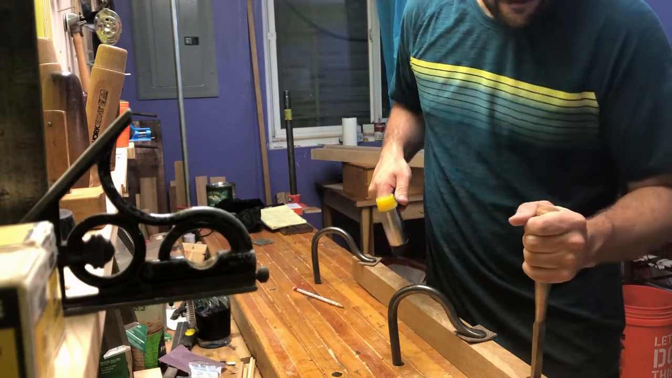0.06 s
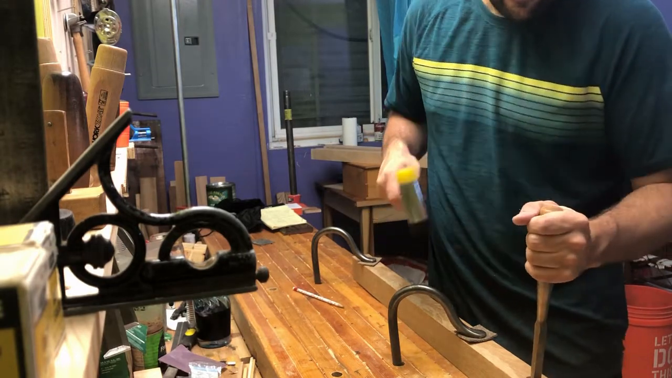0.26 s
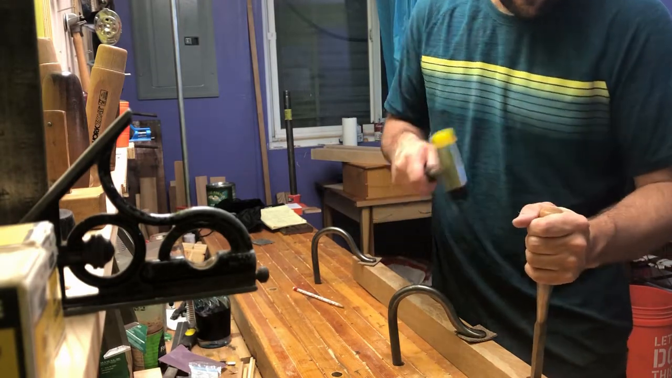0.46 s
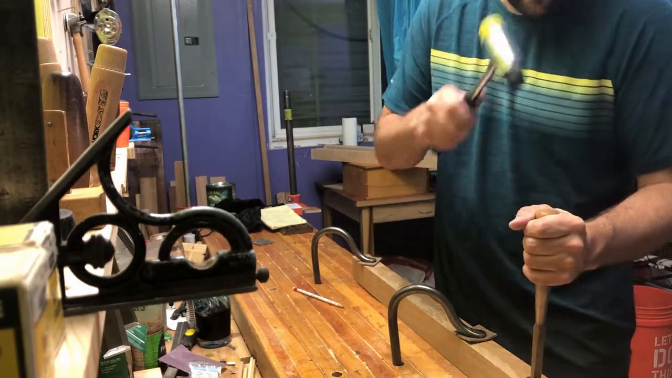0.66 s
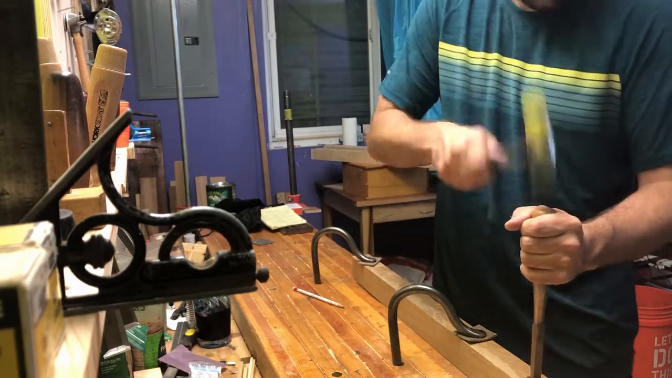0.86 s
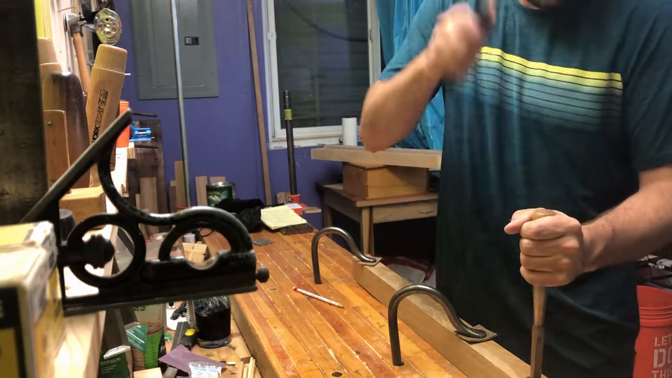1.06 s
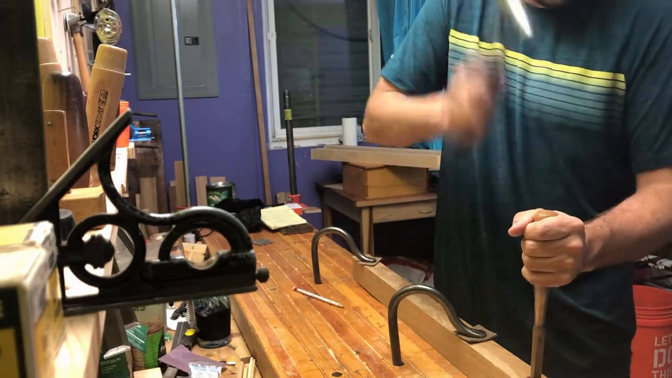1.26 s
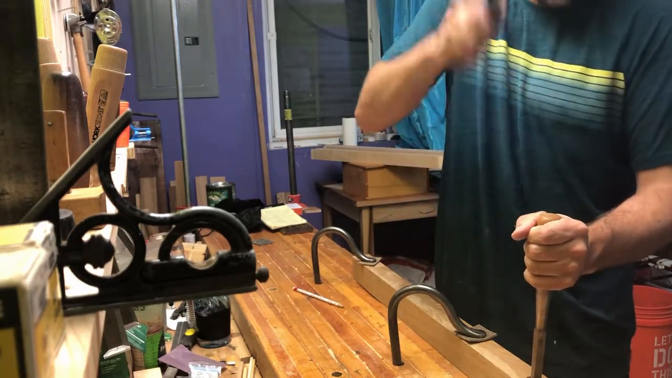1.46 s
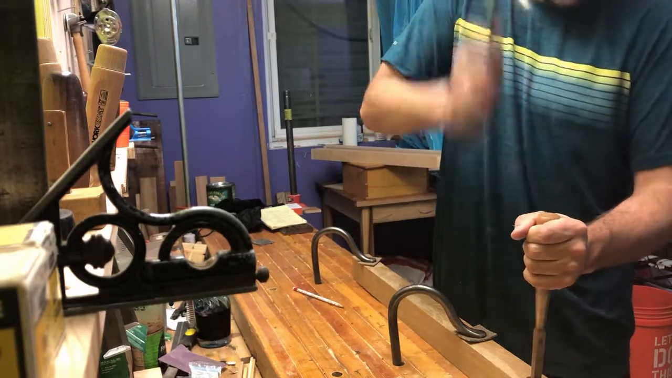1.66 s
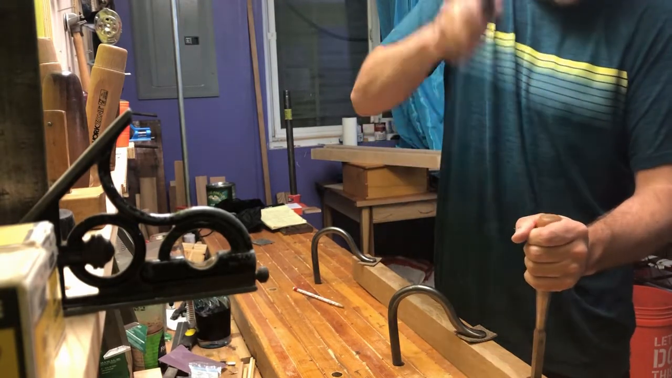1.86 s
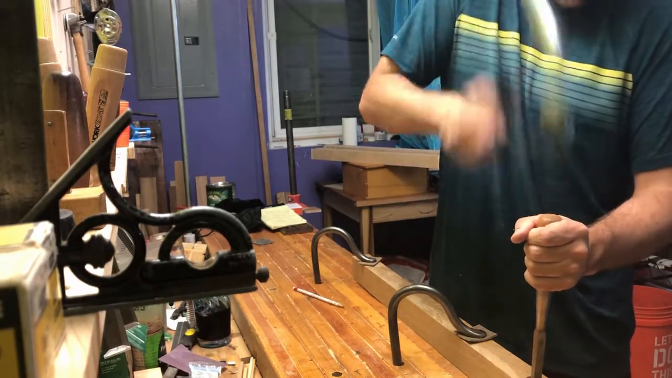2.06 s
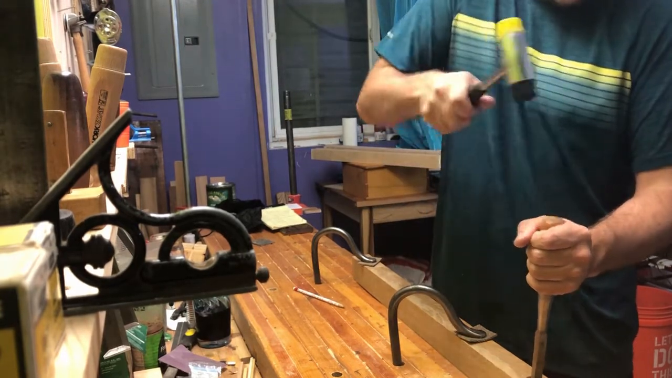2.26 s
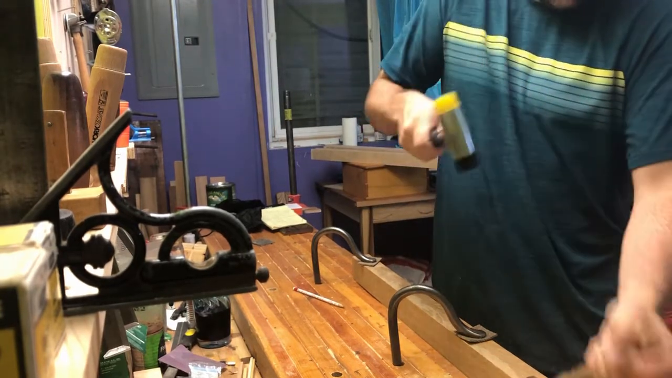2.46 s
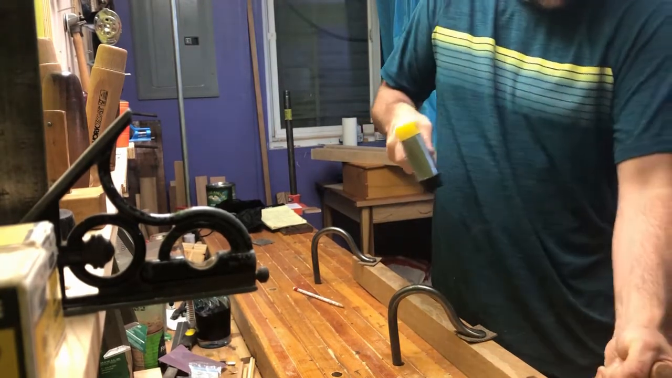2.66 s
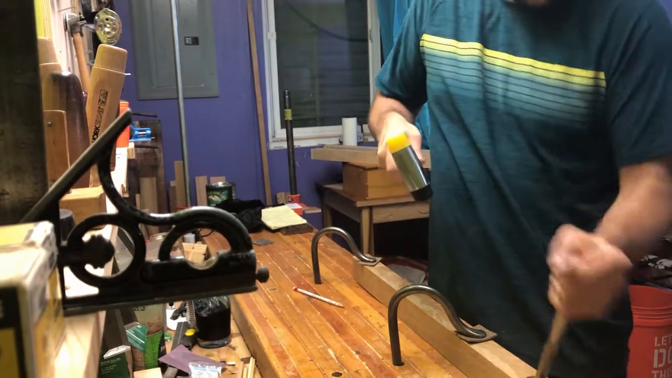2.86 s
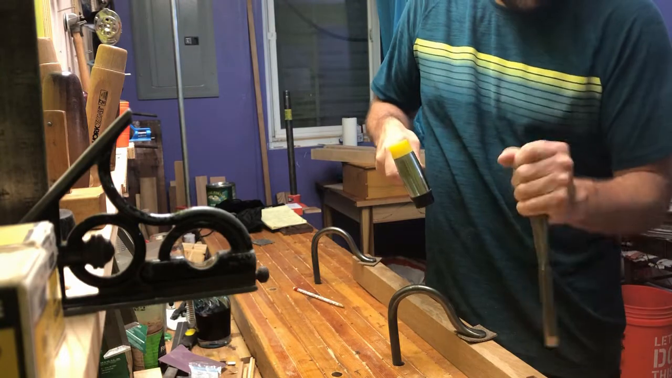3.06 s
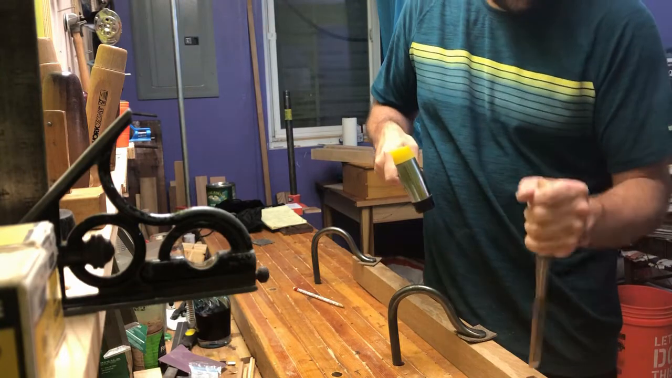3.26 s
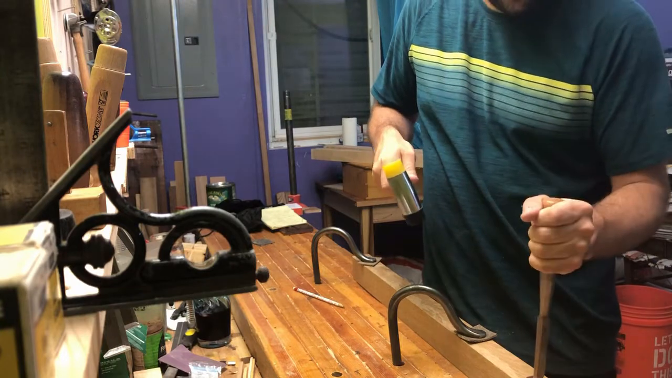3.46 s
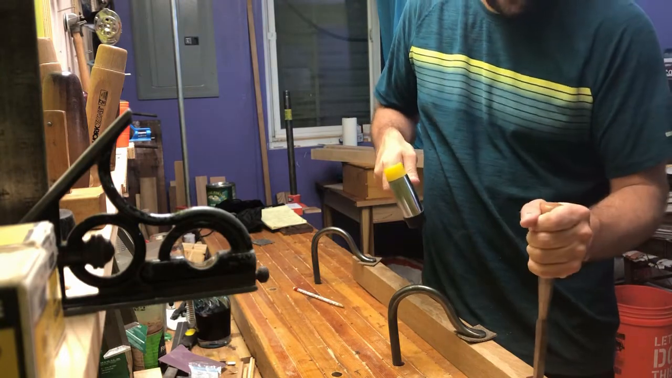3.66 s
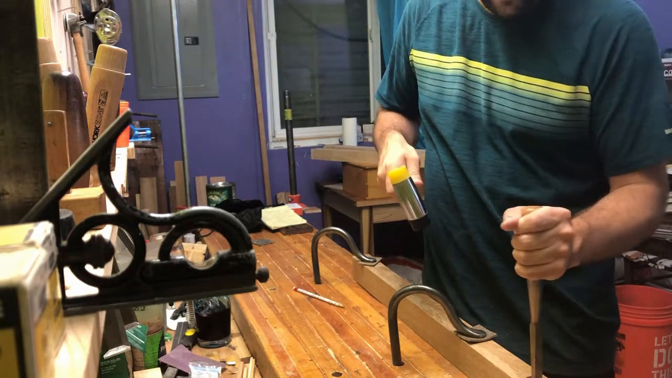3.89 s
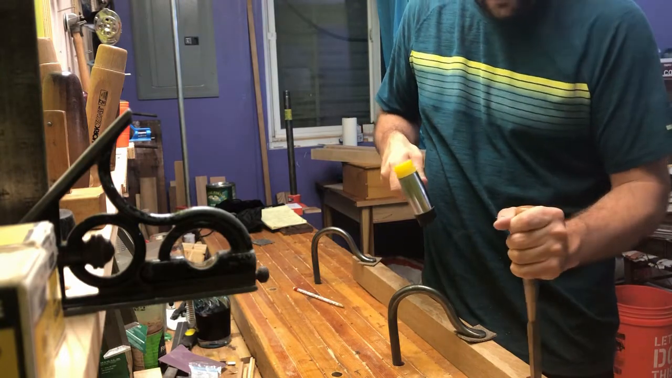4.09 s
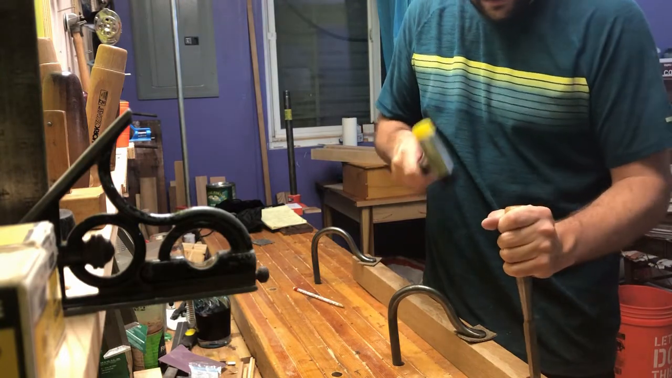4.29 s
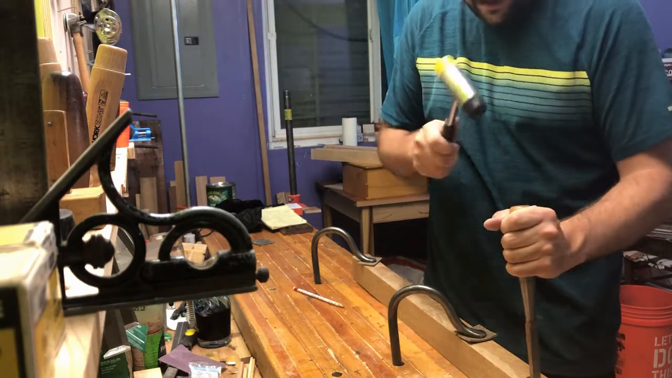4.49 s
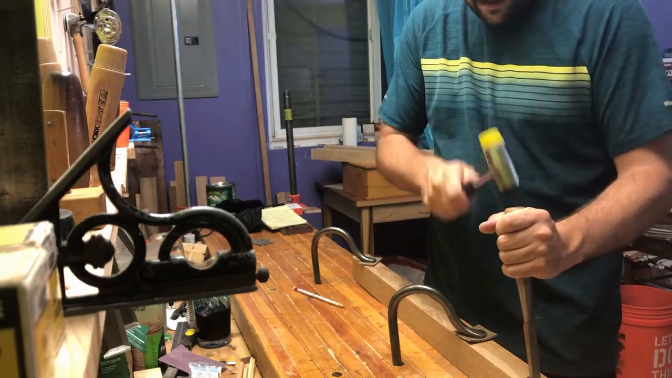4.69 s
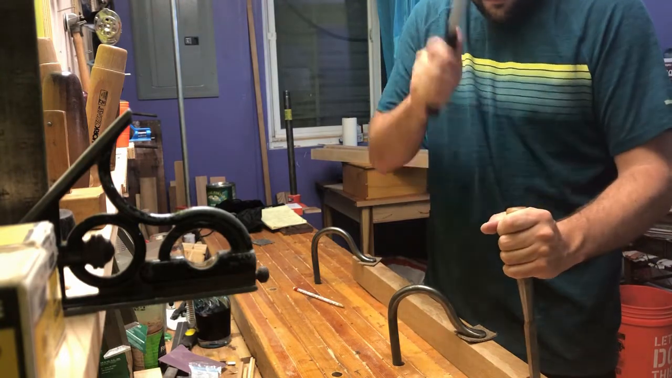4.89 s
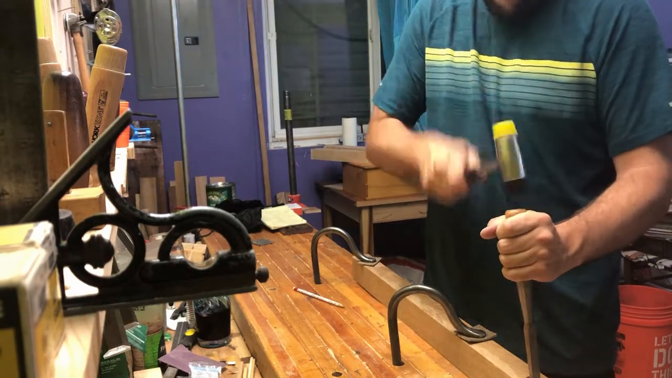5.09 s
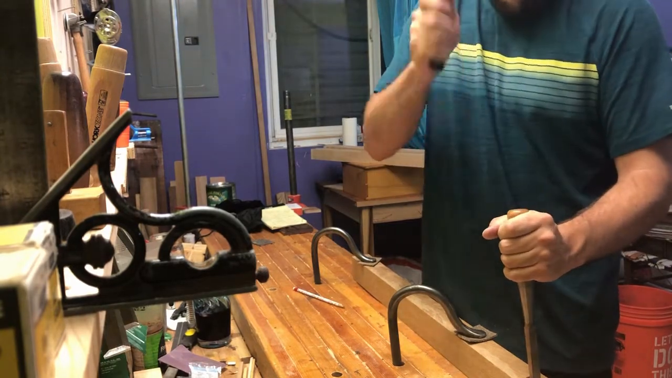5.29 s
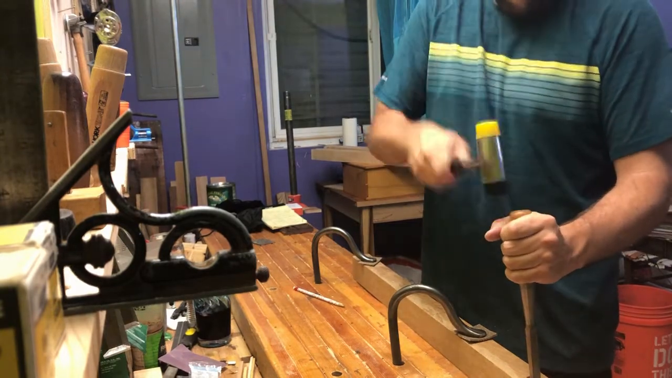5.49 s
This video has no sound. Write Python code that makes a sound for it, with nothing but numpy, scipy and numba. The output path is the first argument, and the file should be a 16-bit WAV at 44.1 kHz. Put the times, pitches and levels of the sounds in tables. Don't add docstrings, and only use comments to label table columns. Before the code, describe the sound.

Phone recording a metre from a workbench. After a second of faint hum and one small clunk, four mallet blows come about 0.4 seconds apart, the first lighter, the others loud and hard-limited, each a crack with low wooden thump, high steel ring and quick wall slap. Then quiet scraping, soft thuds and snapping chips as the chisel is moved, followed by two lighter, crisp blows with room reverberation.

```python
import sys
import numpy as np
from scipy import signal
from scipy.fft import rfft, irfft
from scipy.io import wavfile
from scipy.ndimage import uniform_filter1d, minimum_filter1d
from numba import njit

SR = 44100
rng = np.random.default_rng(int(sys.argv[2]) if len(sys.argv) > 2 else 0)


def gain_from_db(level_db):
    decades = np.asarray(level_db, float) / 20
    return 10 ** decades


def persist_wave(psi):
    counts = np.round(np.clip(psi, -1, 1) * 32767).astype(np.int16)
    wavfile.write(sys.argv[1], SR, np.atleast_2d(counts).T)


N = 244093
T = np.arange(N) / SR
TOP_HZ, STEADY_TOP_HZ, BASS_HZ = 17100, 15750, 45


def on_log_hz(table, hz):
    f, v = np.transpose(table)
    return np.interp(np.log(np.maximum(hz, 1)), np.log(f), v)


def coloured(table, size):
    hz = np.arange(size // 2 + 1) * SR / size
    return irfft(rfft(rng.standard_normal(size)) * gain_from_db(on_log_hz(table, hz)), size)


def unit(x):
    return x / np.sqrt(np.mean(x ** 2))


def band(x, lo_hz, hi_hz):
    return signal.sosfilt(signal.butter(2, [lo_hz, min(hi_hz, SR / 2.1)], "band", fs=SR, output="sos"), x)


def low_pass(x, hz):
    return signal.sosfilt(signal.ellip(8, .2, 60, hz, fs=SR, output="sos"), x)


def ring(modes, lag_s=0., rise_s=1e-4, scatter_db=3.5, detune=0.0089, size=30000):
    hz, db, t60 = np.transpose(modes)[:, :, None]
    level_chance, pitch_chance = rng.standard_normal((len(modes), 2)).T[:, :, None]
    t = np.maximum(np.arange(size) / SR - lag_s * np.sqrt(300 / hz), 0)
    decay = (1 - np.exp(-t / rise_s)) * gain_from_db(-60 * t / t60)
    tone = np.sin(2 * np.pi * hz * (1 + detune * pitch_chance) * t)
    return np.sum(gain_from_db(db + scatter_db * level_chance) * decay * tone, axis=0)


def add(out, s, x):
    i = int(s * SR)
    out[i:i + len(x)] += x[:N - i]


# pitch_hz, level_db (rms)
HUM_TONES = [(59.2, -59.5), (118.4, -63.5), (177.6, -66.5), (242.2, -62.5), (306.8, -71), (387.6, -68.5),
             (446.8, -76.5)]
# pitch_hz, density_db (per Hz)
AIR_COLOUR = [(15, -34.5), (25, -13.5), (58, -3.5), (192, -8), (245, -8), (389, -15), (568, -21.5),
              (706, -22.5), (878, -31.5), (1320, -30.5), (1640, -33), (14800, -54), (16500, -42.5)]
AIR_DB = -63.5


def background():
    air = coloured(AIR_COLOUR, N)
    air = air * gain_from_db(AIR_DB) / np.std(band(air, 340, 16000))
    for hz, db in HUM_TONES:
        waver = unit(uniform_filter1d(rng.standard_normal(N), SR // 8))
        hum = np.sin(2 * np.pi * (hz * T + rng.random()))
        air = air + np.sqrt(2) * gain_from_db(db + 1.5 * waver) * hum
    return air


# start_s, level_db, pitch_hz
SNAPS = [(0.606, -60, 4500), (1.741, -61, 12900), (2.6, -62.5, 13000), (1.306, -59, 4900),
         (1.307, -57.5, 10500), (1.336, -68, 10050), (1.352, -54.5, 1750), (1.353, -61, 6400),
         (1.740, -48.5, 4445), (2.082, -61, 11200), (2.33, -60, 12000), (2.494, -67, 11460),
         (2.515, -63.5, 8040), (2.53, -60.5, 12940), (2.546, -63.5, 9880), (2.791, -63, 5020),
         (3.039, -60.5, 7430), (3.074, -59.5, 7700), (3.1, -72, 7820), (3.553, -61, 4530),
         (3.555, -63, 7300), (3.964, -56, 3028), (3.975, -59.5, 4500), (3.985, -63, 6910),
         (4.364, -59.5, 4760)]
TICK_T60_S = 0.01


def ticks():
    out, t = np.zeros(N), np.arange(2048) / SR
    for s, db, hz in SNAPS:
        noise = band(rng.standard_normal(len(t)), 0.65 * hz, 1.3 * hz)
        snap = unit(band(noise, .5 * hz, 2 * hz))
        mode = ring([(hz, 0, 1.5 * TICK_T60_S)], size=len(t))
        add(out, s, gain_from_db(db - 60 * t / TICK_T60_S) * snap + gain_from_db(db - 2) * mode)
    return out


# loudest_s, level_db, treble_db (re level), fade_s
STROKES = [
    (.608, -55.5, -14, 0.087),
    (2.629, -59, -11.5, 0.056),
    (3.04, -59.5, -17, 0.16),
    (3.37, -74.5, -4, 0.46),
    (3.65, -70, -14, 0.23),
    (3.929, -70.5, -14.5, 0.14),
    (3.968, -60.5, -14, 0.096),
    (4.3, -71, -7, 0.22),
    (4.45, -69.5, -13, 0.041),
]
RUB_RISE_S = 0.0532


def rubs(grain_db=-7.0):
    out = np.zeros(N)
    grain_levels = np.repeat(rng.exponential(size=N // 40 + 1), 40)[:N]
    grains = rng.standard_normal(N) * gain_from_db(grain_db * grain_levels)
    body, hiss = unit(band(grains, 610, 4240)), unit(band(grains, 4600, 11000))
    for s, db, treble_db, fade_s in STROKES:
        away = np.maximum((s - T) / RUB_RISE_S, (T - s) / fade_s)
        out += gain_from_db(db - 60 * away) * (body + gain_from_db(treble_db) * hiss)
    return out


# pitch_hz, level_db, t60_s
BENCH_MODES = [(81.14, -19.5, 0.075), (97, -21.5, 0.44), (133.7, -19, 0.47), (209, -1, 0.36),
               (225.3, -5, 0.18), (278, -14, 0.66), (314, -13, 0.1), (337.4, -14.5, 0.3), (376.8, -6, 0.22),
               (420.3, -4.5, .3), (452, 1.5, 0.21), (499, -12, 0.43), (534, -8.5, 0.23), (675, -24.5, 0.2)]
# start_s, thud_db, thud_hz, knock_db (re thud), knock_hz
SET_DOWNS = [(0.613, -35, 345, -16.5, 1360), (2.643, -45.5, 560, 3.5, 850), (2.809, -55, 520, -2, 861),
             (3.037, -53.5, 460, 3, 1566), (3.063, -45, 370, 0, 1314), (3.083, -34.5, 365, -12, 1150),
             (3.1, -34.5, 384, -27.5, 1280), (3.555, -34.5, 246, -17, 2330), (3.557, -34, 426, -22, 1300),
             (3.575, -43, 505, -9, 912), (3.636, -38, 408, -4.5, 1325), (3.67, -44, 440, -5.5, 1108),
             (3.967, -41, 500, -2, 1510), (4.001, -47, 515, -6, 1187)]
SWELL_S = 0.0024


def knocks():
    out = np.zeros(N)
    for s, db, thud_hz, knock_db, hz in SET_DOWNS:
        near = [(f, g / 2 - 45 * np.log2(f / thud_hz) ** 2 - 3, 0.38 * t60) for f, g, t60 in BENCH_MODES]
        thud = ring(near + [(thud_hz, -4, .06)], rise_s=SWELL_S, lag_s=0.0018, size=8192)
        beam = [(hz, 0, .02), (1.11 * hz, -4, .015), (1.68 * hz, -14, .012)]
        add(out, s, gain_from_db(db) * thud)
        add(out, s, gain_from_db(db + knock_db) * ring(beam, rise_s=0.0015, size=4096))
    return out


# pitch_hz, density_db (per Hz)
SMEAR_COLOUR = [(300, -12), (700, -2), (1500, 0), (3000, -10), (6000, -22), (16500, -40)]
SMEAR_DB, SMEAR_S = -46, .021


def smear():
    out, size = np.zeros(N), int(SMEAR_S * SR)
    for s, db, *_ in STRIKES:
        noise = unit(coloured(SMEAR_COLOUR, 1024))[:size]
        add(out, s - SMEAR_S, gain_from_db(db + SMEAR_DB + np.linspace(-2, 4, size)) * noise)
    return out


# pitch_hz, density_db (per Hz)
SHOCK_COLOUR = [(35, -39), (60, -9), (320, 5.5), (478, 0.5), (697, -8.5), (1200, -13), (1480, -11.5),
                (2110, -20), (2370, -25), (3150, -26.5), (6390, -36.5), (15300, -43), (16800, -44)]
SHADE_HZ = [120, 350, 1500, 4500, 13000]


def pulse(shades_db, spread_s, knee_hz=150, size=4096):
    hz = np.arange(size // 2 + 1) * SR / size
    shades = list(zip(SHADE_HZ, shades_db))
    gain = gain_from_db(on_log_hz(SHOCK_COLOUR, hz) + on_log_hz(shades, hz))
    turns = spread_s * 400 * np.log(1 + hz / knee_hz) + .0005 * hz
    shock = irfft(gain * np.exp(-2j * np.pi * turns), size)
    return shock / np.abs(shock).max()


def crackle(grain_db=3.5, size=4096):
    t = np.arange(size) / SR
    grains = rng.standard_normal(size) * gain_from_db(grain_db * rng.exponential(size=size))
    fade = np.exp(-t / 0.0027) + 0.25 * np.exp(-t / 0.013)
    return unit(low_pass(band(grains, 1500, 15000), STEADY_TOP_HZ)) * fade


def bench_boom(db, thump_db, spread_s):
    modes = []
    for hz, mode_db, t60 in BENCH_MODES:
        tilt = .8 if hz < 250 else -1.5 if hz < 300 else .1
        modes.append((hz, mode_db + thump_db * tilt, t60))
    return gain_from_db(db + BENCH_DB) * ring(modes, lag_s=spread_s, rise_s=0.008, detune=.005, size=22000)


# start_s, level_db, wall_db (share of the walls), hardness_db, rebound_db
STRIKES = [
    (1.002, -17.5, -1, 5.5, -17),
    (1.432, -5, 0, 4, -37),
    (1.8251, -4, 2, 5, -18),
    (2.204, -5, 2, 1, -14),
    (4.801, -14.5, -2, -1.5, -22),
    (5.187, -12.5, 9.5, 6.5, -20),
]
# lag_s (after the blow), level_db
DROPS = [
    (0.025, -8),
    (0.045, -6),
]
# pitch_hz, width_hz, level_db
BEAM_MODES = [(1005, 130, -4.5), (1386, 98, 7), (1994, 140, 0.5), (2480, 170, -10.5), (2704, 170, -8.5),
              (3560, 43, -21), (4480, 75, -15), (5200, 150, -12)]
# pitch_hz, width_hz, level_db
HANDLE_MODES = [(973, 29, -8.5), (1286, 41, -4), (1724, 21, -12), (2600, 47, -17.5), (2854, 78, -5),
                (3520, 93, -9), (4200, 96, -16), (5500, 120, -50)]
LIGHT_DB, WOOD_PITCH = -9, 1.045
BEAM_DB, BENCH_DB = -4.5, -5.5
THUMP_DB, THUMP_PER_DB = -4, -.49
KNOCK_DB, KNOCK_PER_DB = 5, 0.4
SNAP_PER_HARDNESS = 0.57
SPREAD_S, SPREAD_S_PER_HARDNESS = .0093, -.0003
BODY_DB = 3
DIRECT_DB, SNAP_DB = 4, 4.5


def blows():
    near, far = np.zeros((2, N))
    for s, db, wall_db, crack_db, rebound_db in STRIKES:
        thump_db, knock_db = THUMP_DB + THUMP_PER_DB * db, KNOCK_DB + KNOCK_PER_DB * db
        snap_db = SNAP_PER_HARDNESS * crack_db
        spread_s = SPREAD_S + SPREAD_S_PER_HARDNESS * crack_db
        start = s - .0006
        to_walls = pulse([thump_db, 0, knock_db, crack_db, 0.11 * snap_db], spread_s)
        add(far, start, gain_from_db(db + wall_db) * to_walls)
        add(near, s, bench_boom(db, thump_db, spread_s))
        shock = pulse([thump_db, BODY_DB, knock_db, crack_db, SNAP_DB + snap_db], spread_s) * gain_from_db(DIRECT_DB)
        wood = HANDLE_MODES if db < LIGHT_DB else BEAM_MODES
        modes = [(WOOD_PITCH * f, g, 2.7 / w) for f, w, g in wood]
        hits = [(0.00029, 0.017)] + [(lag, loss_db + rebound_db) for lag, loss_db in DROPS]
        for lag, loss_db in hits:
            beam = ring(modes, lag_s=.2 * spread_s, rise_s=0.00043, detune=0.02, size=4096)
            contact = low_pass(shock + gain_from_db(crack_db - 20.5) * crackle(), STEADY_TOP_HZ)
            add(near, start + lag, gain_from_db(db + loss_db) * contact)
            add(near, s + lag, gain_from_db(db + knock_db + BEAM_DB + loss_db) * beam)
    return near, far


# pitch_hz, level_db, t60_s
BLADE_MODES = [(7246, 0, .44), (7290, -3, .33), (7205, -5, .25), (7330, -8, .2)]
STEEL_DB, STEEL_PER_DB, EARNEST_DB = -37.5, 3, -10


def blade():
    out = np.zeros(N)
    for s, db, wall_db, *_ in STRIKES:
        grip_db = 4 * unit(uniform_filter1d(rng.standard_normal(30000), 400))
        steel_db = STEEL_DB + STEEL_PER_DB * min(db + wall_db - EARNEST_DB, 0)
        add(out, s, gain_from_db(steel_db + grip_db) * ring(BLADE_MODES, rise_s=0.033, detune=0.00088))
    return out


DUCK_DB, DUCK_RECOVER_S, BACKGROUND_DB = -3, 0.71, 0.7


def ducking():
    pushed = 0
    for s, db, wall_db, *_ in STRIKES:
        pushed = pushed + gain_from_db(db + wall_db) * (T > s) * np.exp(-np.abs(T - s) / DUCK_RECOVER_S)
    return gain_from_db(BACKGROUND_DB + DUCK_DB * pushed)


# pitch_hz, t60_s
ROOM_T60 = [(60, 0.42), (200, 0.48), (500, 0.49), (1500, 0.46), (4000, 0.45), (8000, 0.44), (12000, 0.34),
            (16000, 0.39)]
# pitch_hz, level_db
ROOM_COLOUR = [(60, 1), (200, -2.5), (500, 0), (1500, 4), (4000, 3.5), (8000, 4), (16000, 5.5)]
FLUTTER_S, FLUTTER_DB, FLUTTER_FADE_S = .025, 9, 0.03
ROOM_DB, ROOM_RISE_S = 7.5, 0.0085


def reverb_tail(size=32768):
    t, tail = np.arange(size) / SR, 0
    for hz in 45 * 2 ** np.arange(0, 8.6, .5):
        db = on_log_hz(ROOM_COLOUR, hz) - 60 * t / on_log_hz(ROOM_T60, hz)
        tail = tail + gain_from_db(db) * band(rng.standard_normal(size), hz / 1.19, hz * 1.229)
    clumps_db = FLUTTER_DB * np.exp(-t / FLUTTER_FADE_S) * np.cos(2 * np.pi * (t / FLUTTER_S - .15))
    tail = tail * gain_from_db(clumps_db) * (1 - np.exp(-t / ROOM_RISE_S))
    return tail / np.sqrt(np.sum(tail ** 2))


# lag_s, level_db
SLAPS = [
    (.007, -7.5),
    (0.013, -26.5),
    (0.023, -10.5),
    (.031, -14),
]
SIDE_DB, SIDE_HZ = -9, 7000


def shop(near, far):
    response = gain_from_db(ROOM_DB) * reverb_tail()
    for s, db in SLAPS:
        response[int(s * SR)] += gain_from_db(db)
    mid = near + signal.fftconvolve(far, low_pass(response, STEADY_TOP_HZ))[:N]
    late = np.roll(near, 7)
    side = gain_from_db(SIDE_DB) * band(band(late, SIDE_HZ, 12500), 0.86 * SIDE_HZ, 15000)
    return np.array([mid + side, mid - side])


HANDLING_WET_DB, TICK_WET_DB = -6, -12


def scene():
    near, far = blows()
    handling, snaps = knocks() + rubs(), low_pass(ticks(), STEADY_TOP_HZ)
    far = far + gain_from_db(HANDLING_WET_DB) * handling + gain_from_db(TICK_WET_DB) * snaps
    steady = blade() + smear() + ducking() * background()
    return shop(near + handling + snaps, far) + low_pass(steady, STEADY_TOP_HZ)


@njit
def recover(wanted, step):
    gain, g = np.empty(len(wanted)), 1.
    for i in range(len(wanted)):
        g = min(wanted[i], g + (1 - g) * step)
        gain[i] = g
    return gain


CEILING_DB, RELEASE_S, LOOKAHEAD_S = -3.3, 0.017, 0.0006


def limiter(x):
    ahead = max(int(LOOKAHEAD_S * SR), 3)
    wanted = np.minimum(1, gain_from_db(CEILING_DB) / (np.abs(x).max(axis=0) + 1e-9))
    gain = recover(minimum_filter1d(wanted, 2 * ahead), 1 / (RELEASE_S * SR))
    return x * uniform_filter1d(gain, ahead)


def band_limit(x):
    return signal.sosfilt(signal.butter(12, 17150, fs=SR, output="sos"), x)


def record(dry):
    low_cut = signal.butter(2, BASS_HZ, "high", fs=SR, output="sos")
    heard = low_pass(signal.sosfilt(low_cut, dry), TOP_HZ)
    mix = limiter(heard)
    return band_limit(mix)


dry = scene()
out = record(dry)
persist_wave(out)
```